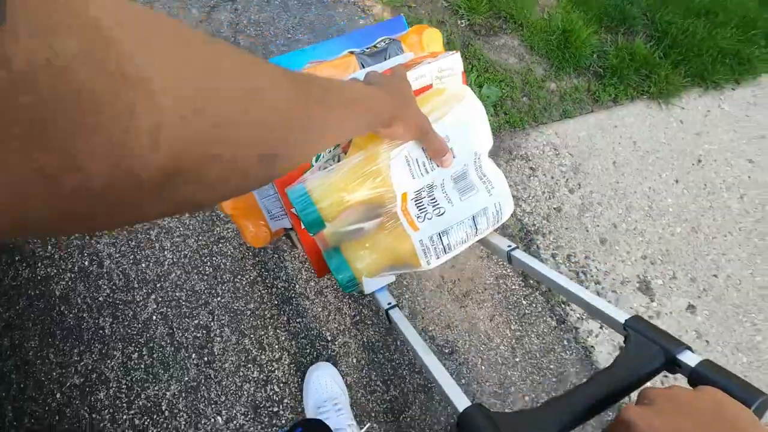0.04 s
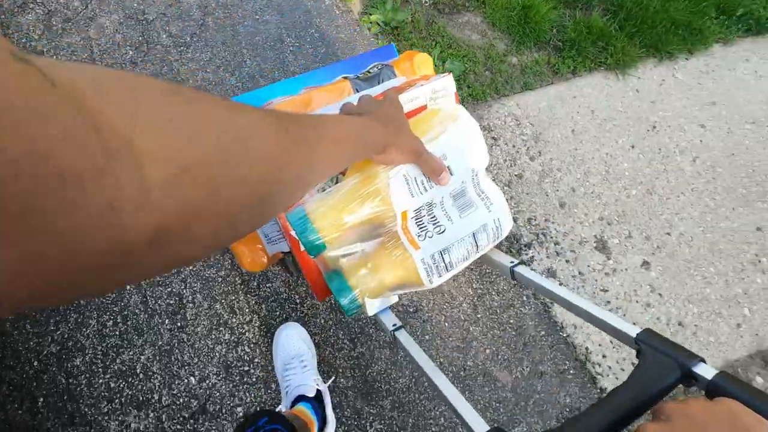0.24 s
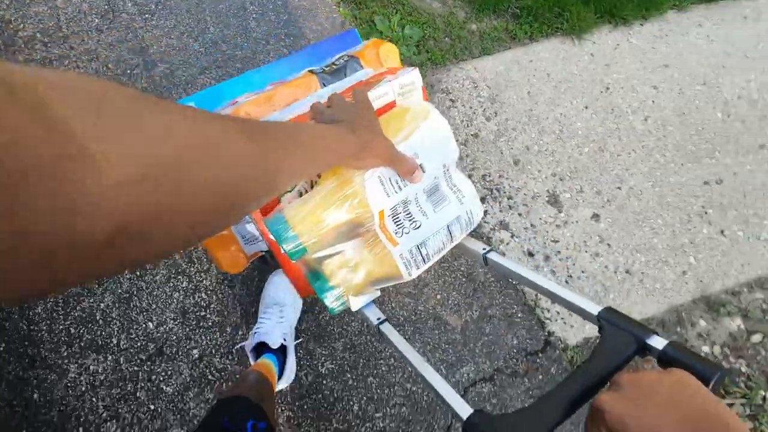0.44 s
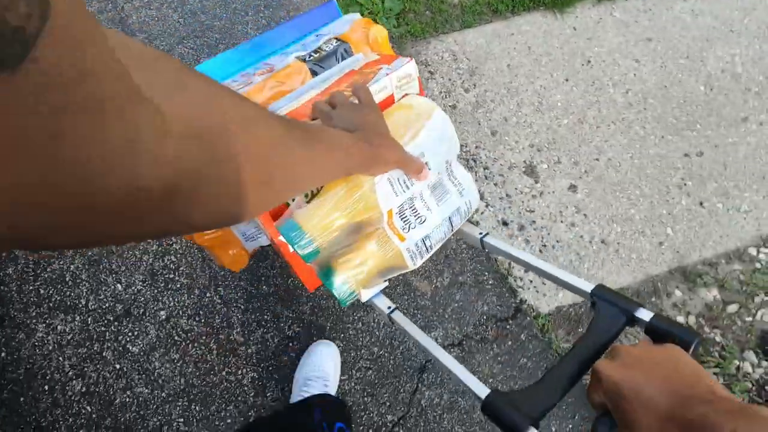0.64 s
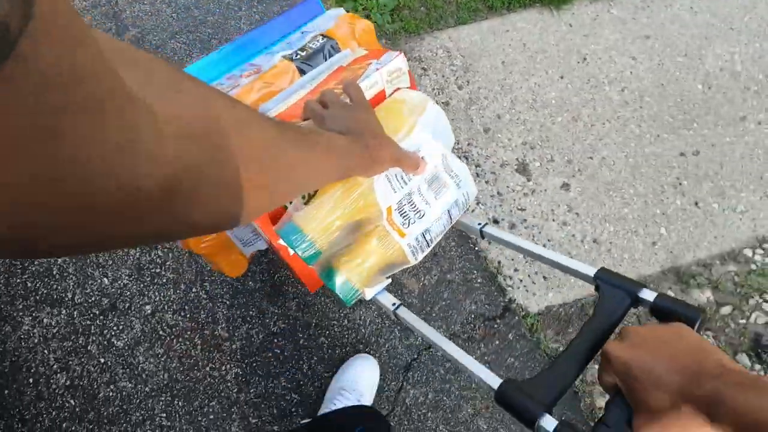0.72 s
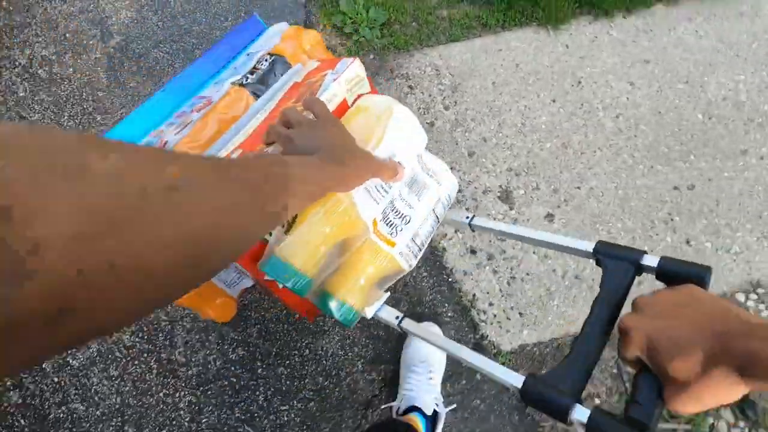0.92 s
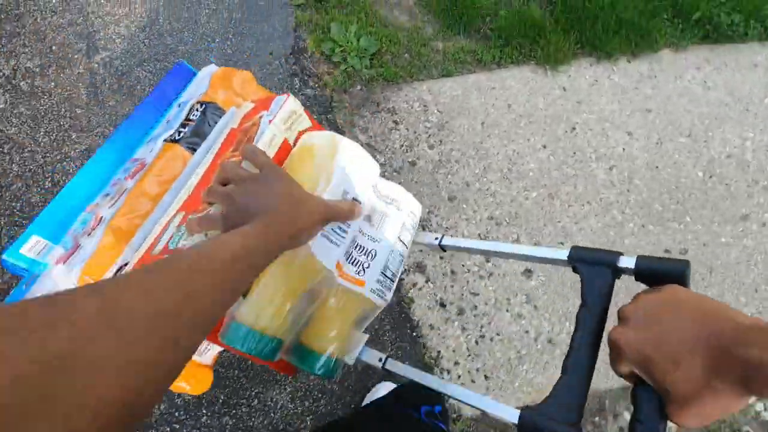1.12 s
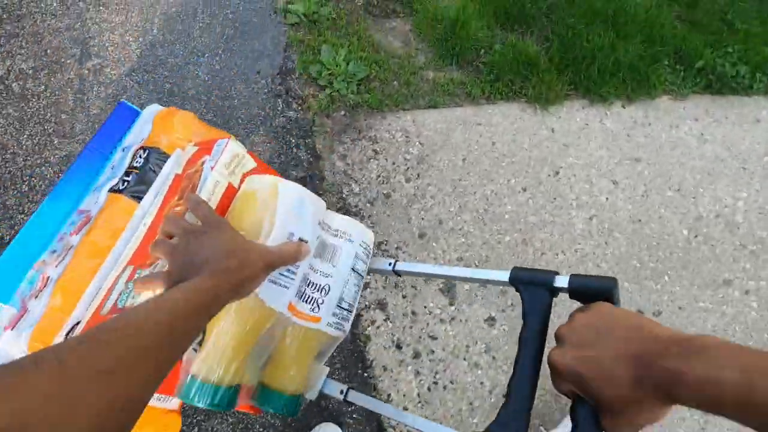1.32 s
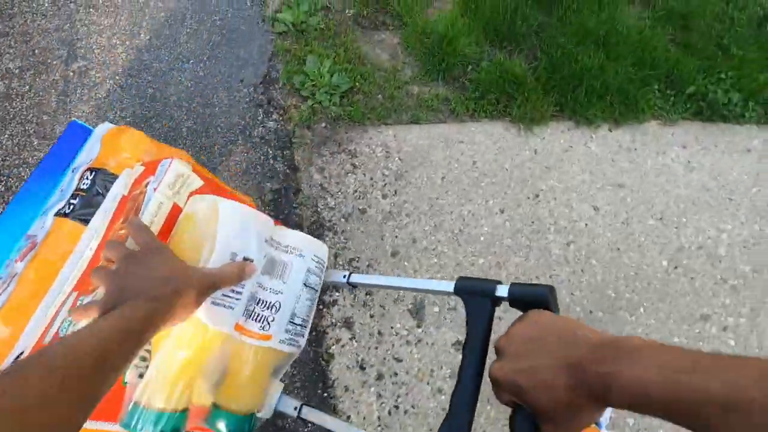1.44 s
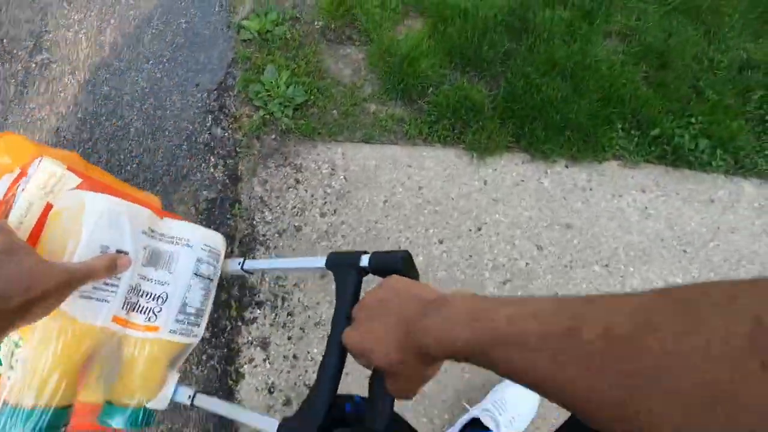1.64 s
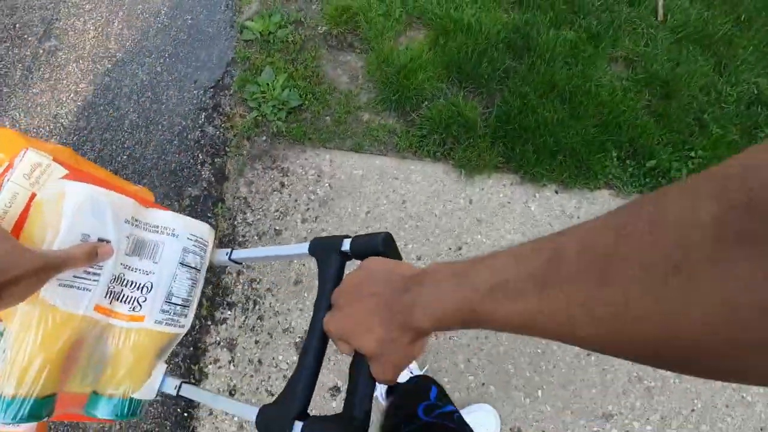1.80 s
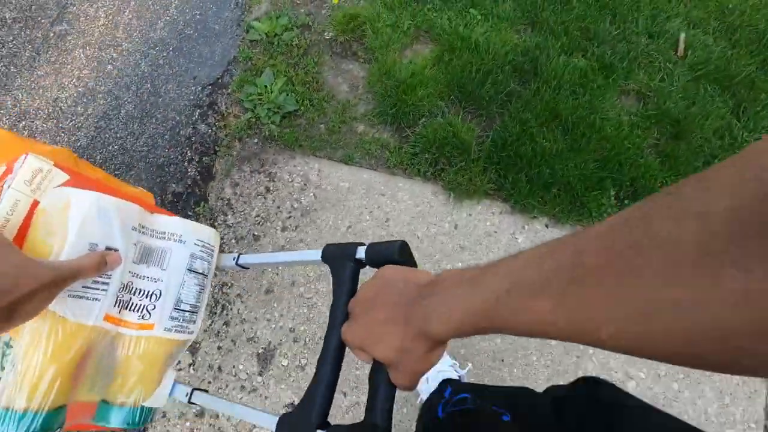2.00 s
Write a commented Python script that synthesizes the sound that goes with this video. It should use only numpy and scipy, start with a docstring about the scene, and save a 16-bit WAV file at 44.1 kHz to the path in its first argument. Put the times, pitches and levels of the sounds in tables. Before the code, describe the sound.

Loaded hand truck rattles over rough asphalt, then scrapes harshly over a concrete edge, outdoors

```python
"""Hand truck rolling onto concrete

A loaded folding hand truck is wheeled from rough asphalt onto a concrete path, close to the microphone.
Small wheels rumble and crunch grit (filtered random clicks) over hiss and gusts (filtered noise) and a
deep steady throb, like an engine idling (low sine). Frame and load clack (noise bursts, ringing sines),
sparrows chirp (gliding pairs of sines), and the truck judders as it scrapes over the edge (booming jolts
and uneven grinding)."""
import sys
import numpy as np
from scipy import signal
from scipy.fft import rfft, irfft
from scipy.io import wavfile
from scipy.ndimage import map_coordinates

SR = 44100
rng = np.random.default_rng(int(sys.argv[2]) if len(sys.argv) > 2 else 0)


def put_to_file(sound):
    """Save the sound as 16-bit audio at rate SR, in the file named by the first command-line argument."""
    columns = np.atleast_2d(sound).T  # one column per channel
    safe = np.clip(columns, -1, 1)
    whole_steps = np.round(safe * 32767)
    wavfile.write(sys.argv[1], SR, whole_steps.astype(np.int16))


N = 91022


def undb(db):
    """Decibels to gain."""
    return 10 ** (np.asarray(db) / 20)


def unit(x):
    """Scale to rms 1."""
    return x / np.sqrt(np.mean(x ** 2))


def curve(table, axis=1):
    """One column of a time table, joined by straight lines."""
    rows = np.array(table)
    return np.interp(np.arange(N) / SR, rows[:, 0], rows[:, axis])


def walk(points_per_s):
    """Smooth random wander with a spread near 1."""
    points = rng.standard_normal(4096)
    return map_coordinates(points, [np.arange(N) / SR * points_per_s], order=3, mode="mirror")


def colour(x, table, keep_power=True):
    """Causal minimum-phase filter through points of (frequency [Hz], level [dB])."""
    size = 2 ** 17
    rows = np.array(table)
    hz = np.arange(size // 2 + 1) * SR / size + 1  # 1 Hz up, to avoid log(0)
    gain = undb(np.interp(np.log(hz), np.log(rows[:, 0]), rows[:, 1]))
    cepstrum = irfft(np.log(unit(gain) if keep_power else gain))
    # folding the cepstrum makes the filter minimum-phase
    cepstrum[1:size // 2] *= 2
    cepstrum[size // 2 + 1:] = 0
    return irfft(rfft(x, size) * np.exp(rfft(cepstrum)))[..., :N]


# stereo width, side against mid: (frequency [Hz], level [dB])
STEREO_WIDTH = [(30, -6), (70, -1.5), (140, -41), (350, -30.5), (800, -7), (2000, -10), (4000, -6.5),
                (8000, 0), (14000, 1)]


def spread(mid, side):
    """Left and right: most alike in the upper bass, wider in the lowest bass and the treble."""
    return mid + colour(side, STEREO_WIDTH, False) * np.array([[1], [-1]])


def noise():
    """Stereo noise, white in the mid."""
    return spread(*rng.standard_normal((2, N)))


def grains(per_s, spread_db):
    """Stereo stream of clicks of uneven size, mid at rms 1."""
    hits = rng.random(N) < per_s / SR
    sizes = hits * undb(spread_db * np.minimum(rng.exponential(size=N), 5))
    return spread(*unit(sizes * rng.standard_normal((2, N))))


def pings(times, dbs, hzs, rises, swell):
    """Each push sets one part swinging at its own pitch: it peaks after its rise time and dies away."""
    t, out = np.arange(N) / SR, np.zeros(N)
    for start, db, hz, rise in zip(times, dbs, hzs, np.broadcast_to(rises, len(times))):
        age = t[:N - int(start * SR)]
        envelope = (age / rise * np.exp(1 - age / rise)) ** swell
        out[-len(age):] += undb(db) * envelope * np.sin(2 * np.pi * hz * age)
    return out


TAIL_S, TAIL_DB = 0.028, -15.5  # tail decay [s] and level against the chatter [dB]
SCATTER_S = 0.0013  # decay of the contact's scattered side signal [s]


def blows(times, dbs, decays, snap):
    """Each blow is a sharp contact, a few milliseconds of chatter and a faint tail."""
    t, power, contact = np.arange(N) / SR, np.zeros(N), np.zeros(N)
    for start, db, decay in zip(times, dbs, decays):
        i = int(start * SR)
        age = t[:N - i]
        tail = undb(TAIL_DB) ** 2 * np.exp(-2 * age / TAIL_S)
        power[i:] += undb(db) ** 2 * (np.exp(-2 * age / decay) + tail)
        contact[i] += snap * undb(db)
    scatter = rng.standard_normal(SR // 100) * np.exp(-t[:SR // 100] / SCATTER_S)
    glancing = signal.fftconvolve(contact, scatter / np.sqrt(np.sum(scatter ** 2)))[:N]
    return np.sqrt(2) * (np.sqrt(power) * noise() + spread(contact, glancing))


def ring(x, table, level_db):
    """A metal part rings on after a push, each mode a decaying sine."""
    t = np.arange(SR // 4) / SR
    modes = sum(undb(db) * np.sin(2 * np.pi * hz * t) * np.exp(-np.log(1000) * t / t60)
                for hz, db, t60 in table)
    response = modes[None] / np.sqrt(np.sum(modes ** 2))
    return undb(level_db) * signal.fftconvolve(x, response, axes=1)[:, :N]


# rolling: (time [s], rumble level [dB], crunch level [dB], grit hiss level [dB])
ROLLING_LEVELS = [(0, -31, -39, -68), (.14, -34, -43.5, -70), (.33, -32.5, -43.5, -70),
                  (.46, -34.5, -40.5, -76), (.58, -38, -41.5, -47), (.69, -35, -31.5, -39),
                  (.76, -40, -41.5, -60), (.92, -40, -44.5, -48.5), (1.02, -41, -41.5, -52),
                  (1.12, -38.5, -50, -64), (1.27, -39.5, -44, -75), (1.38, -45.5, -50, -62),
                  (1.48, -51, -54, -56), (1.54, -37, -46, -69), (1.61, -55, -51.5, -63),
                  (1.67, -43, -41, -57), (1.75, -41.5, -50, -62), (1.88, -44, -45.5, -51),
                  (1.95, -30.5, -41, -56), (2.06, -38.5, -41.5, -64)]
# low rumble of the wheels: (frequency [Hz], relative level [dB])
RUMBLE_SPECTRUM = [(32, -21.5), (72, 3), (132, -4.5), (205, -7), (410, -4.5), (610, -22), (1250, -27.5),
                   (15500, -99)]
# crunch under the wheels: (frequency [Hz], relative level [dB])
CRUNCH_SPECTRUM = [(210, -7.5), (560, 1.5), (890, -0.5), (1360, -7.5), (2220, -4), (3120, -10.5),
                   (6100, -21.5), (15500, -49)]
# bright hiss of the grit: (frequency [Hz], relative level [dB])
GRIT_SPECTRUM = [(820, -32), (2450, -45), (3050, -8), (4150, 2), (5550, -11.5), (7550, -15), (9600, -33),
                 (13100, -28), (15800, -46)]
GRAINS_PER_S, GRAIN_SPREAD_DB, RUMBLE_SPREAD_DB = 4500, 2, 0.6
BUMP_RATE, BUMP_DB = 68, 3  # random points per second, spread [dB]


def wheels():
    """Dense grains of grit under the wheels, swelling on each small bump; the load smooths the rumble."""
    bumps = unit(undb(BUMP_DB * walk(BUMP_RATE)))
    layers = ((RUMBLE_SPECTRUM, RUMBLE_SPREAD_DB), (CRUNCH_SPECTRUM, GRAIN_SPREAD_DB),
              (GRIT_SPECTRUM, GRAIN_SPREAD_DB))
    out = 0
    for column, (spectrum, spread_db) in enumerate(layers, start=1):
        level = undb(curve(ROLLING_LEVELS, axis=column))
        out = out + colour(grains(GRAINS_PER_S, spread_db) * bumps * level, spectrum)
    return out


THROB_HZ, THROB_DB = 26.2, -29  # centre of its slight wander
THROB_SIDE_DB = -21  # side against mid
DRONE_HZ, DRONE_DB = 124, -47.5  # centre of its wandering pitch and level


def engine_throb():
    """A deep, nearly steady sine throbs under a drone that wavers in pitch and level."""
    phase = 2 * np.pi * np.cumsum(THROB_HZ * (1 + 0.0027 * walk(2.52))) / SR
    throb_gain = np.sqrt(2) * undb(THROB_DB + 0.3 * walk(5.8))
    side = undb(THROB_SIDE_DB) * np.cos(phase) * np.array([[1], [-1]])
    drone_gain = np.sqrt(2) * undb(DRONE_DB + 5.0 * walk(7.73))
    drone_phase = 2 * np.pi * np.cumsum(DRONE_HZ * (1 + 0.0606 * walk(24.04))) / SR
    return throb_gain * (np.sin(phase) + side) + drone_gain * np.sin(drone_phase)


# air buffeting the microphone: (time [s], level [dB])
GUST_LEVELS = [(0, -48), (.37, -42), (.49, -31), (.58, -33.5), (.69, -27.5), (.79, -45), (1.19, -41),
               (1.3, -41.5), (1.5, -36.5), (1.76, -41.5), (1.88, -34.5), (1.98, -32), (2.06, -48)]
# low rush of that air: (frequency [Hz], relative level [dB])
AIR_SPECTRUM = [(13, -8.5), (31, 1), (66, 4.5), (102, -13.5), (205, -10), (1050, -96), (15500, -100)]


def gusts():
    """Air buffets the microphone: bass-heavy noise that swells and sinks."""
    return colour(noise(), AIR_SPECTRUM) * undb(curve(GUST_LEVELS))


# distant outdoor hiss: (frequency [Hz], relative level [dB])
OUTDOORS_SPECTRUM = [(62, 7.5), (205, -3), (510, -8.5), (1020, -3), (2050, -12), (5100, -14), (7600, -22),
                     (10100, -37), (15800, -36)]
OUTDOORS_DB = -51


def outdoors():
    """Distant hiss, a steady bed of filtered noise."""
    return colour(noise(), OUTDOORS_SPECTRUM) * undb(OUTDOORS_DB)


# clacks of frame and load: (time [s], thud level [dB], thud pitch [Hz], knock level before trim [dB],
# tick level before trim [dB], knock and tick decay [ms], ping level [dB], ping pitch [Hz])
CLACK_HITS = [(.024, -29, 178, -36, -40.5, 15, -41, 900), (.0508, -36, 242, -34, -48, 8.2, -32, 1740),
              (.058, -37, 430, -32.5, -38, 15, -34, 846), (.0677, -26, 465, -36, -44.5, 5.8, -34, 850),
              (.1067, -30, 392, -51, -45, 2.6, -34, 1940), (.1641, -32, 340, -30.5, -33, 3.9, -28, 1930),
              (.1883, -26, 195, -46, -39, 4.7, -34, 3480), (.2479, -25.5, 372, -35.5, -42.5, 6, -48, 1410),
              (.2622, -27, 221, -38, -49, 4.4, -41, 1090), (.2754, -23.5, 305, -34.5, -40, 7.4, -41, 1520),
              (.311, -23, 260, -60, -67, 2.9, -50, 900), (.4351, -24.5, 437, -43, -31.5, 4, -28.5, 2250),
              (.4996, -23.5, 204, -34, -43.5, 9.5, -33, 990),
              (.5346, -18, 410, -32.5, -24.5, 8, -22.5, 3770), (.5415, -30, 414, -25.5, -28, 2, -23, 860),
              (.566, -20, 223, -38, -62, 8.3, -29, 995), (.6607, -48, 212, -37, -31, 12, -33, 1420),
              (.6665, -40, 300, -45, -31, 6.2, -39, 3430), (.6719, -38, 484, -32.5, -34, 8.3, -22.5, 1040),
              (.6834, -27, 382, -43, -36, 4.9, -28, 910), (.716, -37, 274, -36, -54, 4, -31, 1970),
              (1.1134, -31.5, 184, -40, -66, 9.2, -26.5, 936), (1.1469, -36, 274, -36, -38.5, 5, -32, 1070),
              (1.1648, -36, 215, -48, -37, 1.7, -42, 945), (1.2002, -45, 236, -44, -44, 5, -39, 2640),
              (1.2278, -49, 190, -38.5, -40.5, 7.1, -32.5, 1010),
              (1.241, -29, 256, -48, -58, 3.6, -34, 880), (1.2748, -52, 343, -56, -44.5, 2.2, -54, 4290),
              (1.3041, -35, 247, -43, -53, 8, -36, 925), (1.6392, -21.5, 210, -35.5, -46, 2.7, -28, 1130),
              (1.6779, -35, 382, -28.5, -60, 1.3, -29, 1060), (1.712, -35, 177, -46, -47, 15, -39, 1685),
              (1.7768, -23, 560, -29.5, -40, 1.7, -31.5, 1950),
              (1.8453, -38, 172, -41.5, -43, 8.2, -37, 1110), (1.9075, -37, 520, -33, -30, 7.8, -35, 1840),
              (1.9115, -31, 656, -37, -42, 3.4, -25, 1910),
              (1.9222, -21.5, 173, -21.5, -26, 5.1, -21.5, 1900),
              (1.9905, -25, 479, -32.5, -38, 4.6, -33, 2150), (1.9984, -23, 447, -29.5, -38, 8.2, -39, 860),
              (2.0093, -29, 337, -43, -36, 2.5, -35, 1400)]
# knock of the frame: (frequency [Hz], relative level [dB])
KNOCK_SPECTRUM = [(150, -33), (450, 9), (850, 4), (1300, 0.5), (2000, 0), (2800, -13.5), (5000, -20),
                  (16000, -57)]
# tick of loose joints: (frequency [Hz], relative level [dB])
TICK_SPECTRUM = [(500, -9), (2000, -5.5), (3600, 5.5), (5000, -3), (6300, -6.5), (7700, -4), (9500, -20.5),
                 (13000, -21), (16000, -44)]
# ringing of the tubes, also rung by the scrape: (frequency [Hz], relative level [dB], t60 [s])
TUBE_MODES = [(764, -11, 0.12), (1084, 5.5, 0.12), (1335, -7, 0.15), (1743, 13.5, 0.015), (2040, -7, 0.21),
              (2294, -17, 0.26), (2980, -2.5, 0.12), (3970, -4, 0.27)]
FRAME_DB = -12  # tube ringing against what drives it
KNOCK_TRIM_DB, TICK_TRIM_DB = -1.5, -0.5
CLACK_SNAP = 3  # first contact against the chatter after it
THUD_RISE_CYCLES, THUD_SWELL = 0.32, 0.46
PING_RISE_S, PING_SWELL = 0.0004, 0.15


def clacks():
    """The load thuds, the struck part pings, the frame knocks and rings, loose joints tick."""
    times, thud, thud_hz, knock, tick, decay_ms, ping, ping_hz = np.array(CLACK_HITS).T
    decays = decay_ms / 1000
    thuds = pings(times, thud, thud_hz, THUD_RISE_CYCLES / thud_hz, THUD_SWELL)
    struck = pings(times, ping, ping_hz, PING_RISE_S, PING_SWELL)
    knocks = blows(times, knock + KNOCK_TRIM_DB, decays, CLACK_SNAP)
    frame = colour(knocks, KNOCK_SPECTRUM) + ring(knocks, TUBE_MODES, FRAME_DB)
    ticks = colour(blows(times, tick + TICK_TRIM_DB, decays, CLACK_SNAP), TICK_SPECTRUM)
    return thuds + struck + frame + ticks


LOWER_VOICE = .91  # second voice's pitch against the first
CHIRP_WAVER = .007  # spread of the pitch flutter, as a fraction


def whistle(hz, gain, lower_db):
    """A sparrow's two voices, the second a little below the first."""
    phase = 2 * np.pi * np.cumsum(hz * (1 + CHIRP_WAVER * walk(360))) / SR
    voices = np.sin(phase) + undb(lower_db) * np.sin(LOWER_VOICE * phase)
    return np.sqrt(2) * gain * voices


# falling chirps: (time [s], level [dB])
FALLING_CHIRPS = [(0.321, -47), (1.628, -41)]
# their shared shape: (time from the start [s], pitch [Hz], relative level [dB])
FALLING_SHAPE = [(0, 5200, -18), (.008, 5850, -4), (.02, 5550, 0), (.034, 5000, -5), (.051, 4120, -22)]
# arched and rising chirps: (time [s], length [s], start pitch [Hz], mid-chirp pitch [Hz],
# end pitch [Hz], level [dB], lower voice against upper [dB])
BENT_CHIRPS = [(.452, .048, 4700, 5450, 4750, -47, -12), (.976, .052, 4600, 5120, 4850, -44.5, -14),
               (1.381, .07, 3700, 5600, 4000, -46, -6), (1.39, .09, 3100, 3170, 3100, -60, -25),
               (1.497, .055, 3600, 4650, 4500, -53, -16), (1.596, .026, 5700, 6300, 6900, -58, -22),
               (1.801, .049, 3650, 5500, 5400, -43, -22), (1.704, .074, 2850, 3350, 3800, -54, -22)]
BEND_POWER = 2.6  # higher holds the mid-chirp pitch longer
BIRD_ECHO_DB, BIRD_ECHO_S = -11, .022


def sparrows():
    """Arched, rising and falling chirps, echoed by the surroundings as decaying noise."""
    t = np.arange(N) / SR
    age, fall_hz, fall_db = np.array(FALLING_SHAPE).T
    song = np.zeros(N)
    for start, db in FALLING_CHIRPS:
        hz = np.interp(t - start, age, fall_hz)
        gain = np.interp(t - start, age, undb(db + fall_db), left=0, right=0)
        song += whistle(hz, gain, -0.62)
    for start, length, first_hz, mid_hz, last_hz, db, lower_db in BENT_CHIRPS:
        u = np.clip(2 * (t - start) / length - 1, -1, 1)  # -1 at the start, 0 mid-chirp, 1 at the end
        hz = mid_hz + (np.where(u < 0, first_hz, last_hz) - mid_hz) * np.abs(u) ** BEND_POWER
        song += whistle(hz, undb(db) * (1 - u ** 2), lower_db)
    echo = rng.standard_normal((2, SR // 2)) * np.exp(-t[:SR // 2] / BIRD_ECHO_S)
    echo = echo / np.sqrt(np.sum(echo[0] ** 2))
    return song + undb(BIRD_ECHO_DB) * signal.fftconvolve(song[None], echo, axes=1)[:, :N]


# jolts over the edge: (time [s], boom level [dB], boom pitch [Hz], rasp level [dB])
JOLTS = [(0.7686, -20, 326, -40), (0.7719, -16.5, 893, -27), (.7785, -22, 970, -30),
         (0.7901, -28, 900, -31), (0.8099, -18, 800, -26), (0.8213, -17, 860, -29.5), (.833, -21, 810, -43),
         (.8485, -18, 900, -31.5), (0.8527, -16, 890, -32.5), (0.858, -21, 1140, -43),
         (0.8745, -14, 900, -35), (.883, -19, 860, -39), (.9, -14, 840, -38), (0.922, -31, 965, -39.5)]
# grinding between the jolts: (time [s], level [dB])
GRIND_LEVELS = [(.766, -70), (.774, -25), (.796, -27), (.804, -25), (.814, -36.5), (.84, -28),
                (.853, -29.5), (.881, -30.5), (.906, -33), (.935, -60)]
# boom of the jolts: (frequency [Hz], relative level [dB])
BOOM_SPECTRUM = [(110, -8), (250, -1), (345, 2), (580, -10.5), (715, -8.5), (885, 5), (1040, -2),
                 (1290, -21), (3000, -41), (15000, -81)]
# rasp of the edge: (frequency [Hz], relative level [dB])
RASP_SPECTRUM = [(200, 1.5), (800, 9.5), (1400, -1), (2200, 9.5), (3000, -1), (3900, 0.5), (5200, -10.5),
                 (7500, -16), (9500, -26.5), (14000, -39), (16000, -46)]
# ringing of the base plate: (frequency [Hz], relative level [dB], t60 [s])
PLATE_MODES = [(486, 12.5, 0.12), (747, 10, 0.16), (826, -19, 0.063), (880, -16, 0.052), (960, -16, 0.071),
               (1062, 0, 0.057)]
PLATE_DB = -8  # plate ringing against the noisy jolts
JOLT_DECAY_S, RASP_SNAP = 0.0079, 2.4
BOOM_SNAP, BOOM_NOISE_DB = 1.2, -12.5  # noisy jolts against the boom column [dB]
JOLT_RISE_S, JOLT_SWELL = 0.0024, 3.2
GRIND_GRAINS_PER_S, GRIND_SPREAD_DB = 3200, 2
JUDDER_RATE, JUDDER_DB = 222, 2  # random points per second, spread [dB]


def scrape():
    """Stick-slip jolts boom in the base plate while it grinds and judders on the concrete."""
    times, boom, boom_hz, rasp = np.array(JOLTS).T
    decays = np.full(len(times), JOLT_DECAY_S)
    grit = grains(GRIND_GRAINS_PER_S, GRIND_SPREAD_DB)
    judder = unit(undb(JUDDER_DB * walk(JUDDER_RATE)))
    grinding = grit * judder * undb(curve(GRIND_LEVELS))
    rasping = grinding + blows(times, rasp, decays, RASP_SNAP)
    jolts = blows(times, boom + BOOM_NOISE_DB, decays, BOOM_SNAP)
    booms = pings(times, boom, boom_hz, JOLT_RISE_S, JOLT_SWELL)
    plate = booms + colour(jolts, BOOM_SPECTRUM) + ring(jolts, PLATE_MODES, PLATE_DB)
    return plate + colour(rasping, RASP_SPECTRUM) + ring(rasping, TUBE_MODES, FRAME_DB)


# phase lag of the truck on the left: (frequency [Hz], lag [rad])
LEFT_LAG = [(0, 0.036), (1000, 0.52), (2500, 1), (6000, 0.52), (22050, 0.16)]
LEFT_DB = 1.78  # truck on the left against the right


def scene():
    """The truck reaches the left microphone slightly later and louder; birds and background join it."""
    left, right = clacks() + scrape() + wheels()
    lag = np.interp(np.arange(N // 2 + 1) * SR / N, *np.array(LEFT_LAG).T)
    left = irfft(rfft(left) * np.exp(-1j * lag), N)
    truck = np.array([left * undb(LEFT_DB / 2), right * undb(-LEFT_DB / 2)])
    return truck + sparrows() + engine_throb() + gusts() + outdoors()


TOP_HZ = 15600


def record(dry):
    """The recorder cuts the top with a steep low-pass."""
    return signal.sosfilt(signal.ellip(8, .2, 70, TOP_HZ, fs=SR, output="sos"), dry)


dry = scene()
out = record(dry)
put_to_file(out)
```